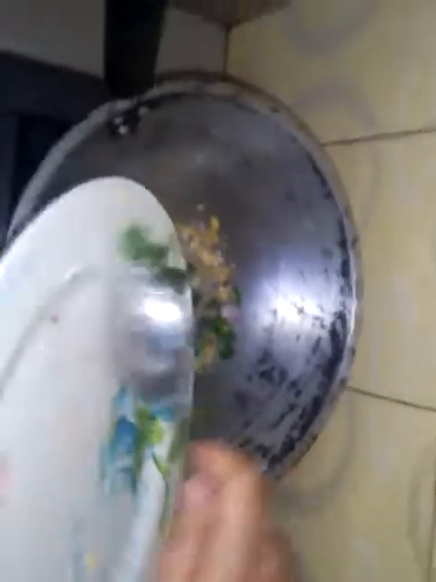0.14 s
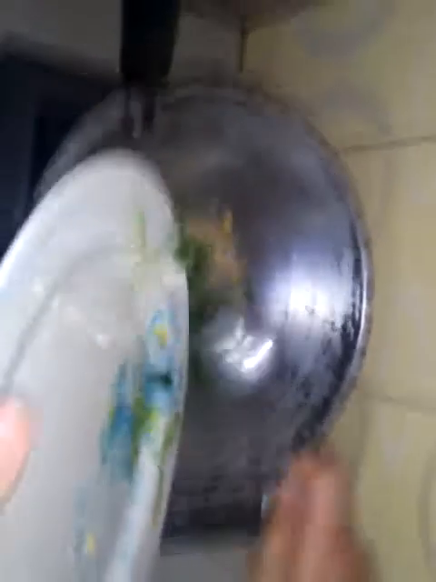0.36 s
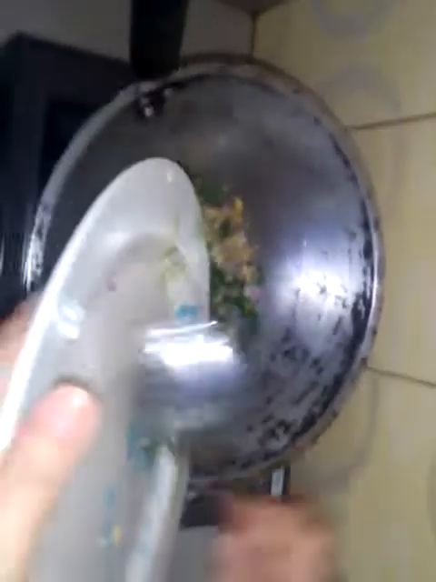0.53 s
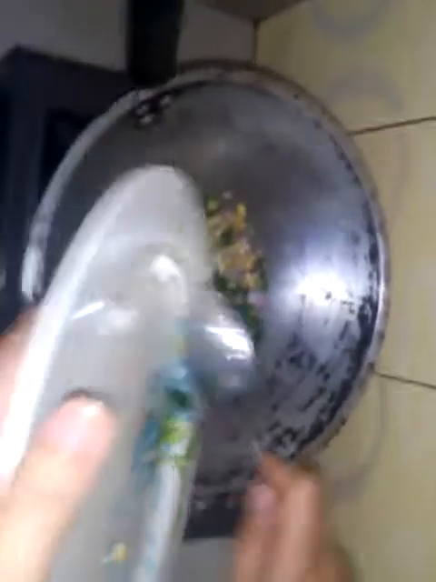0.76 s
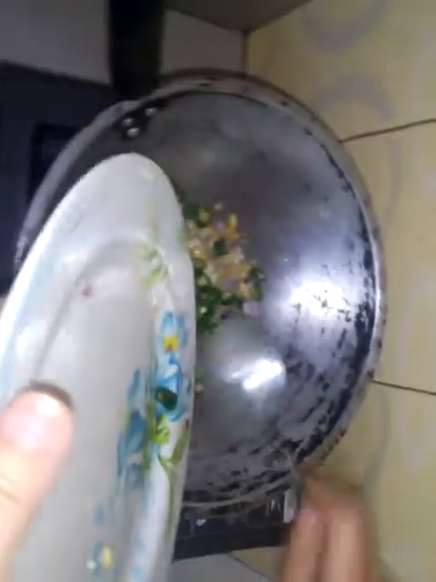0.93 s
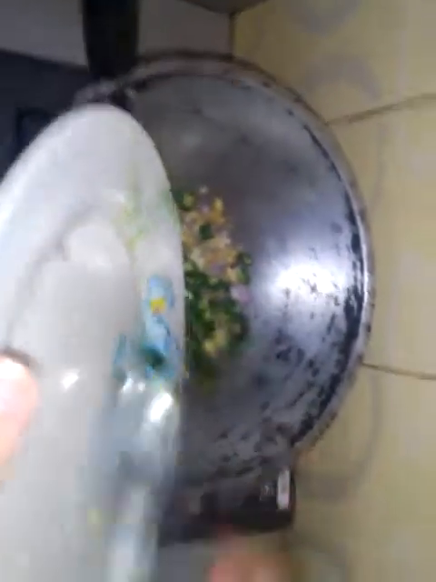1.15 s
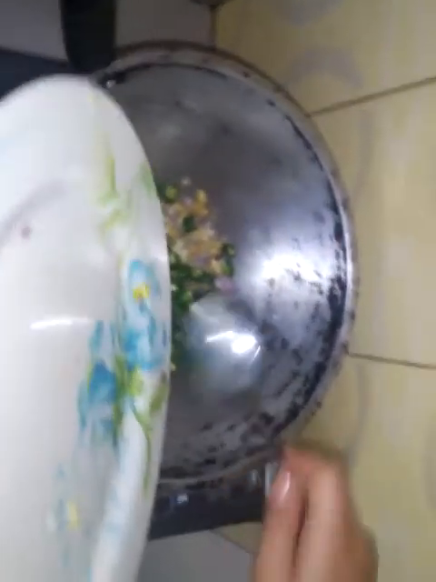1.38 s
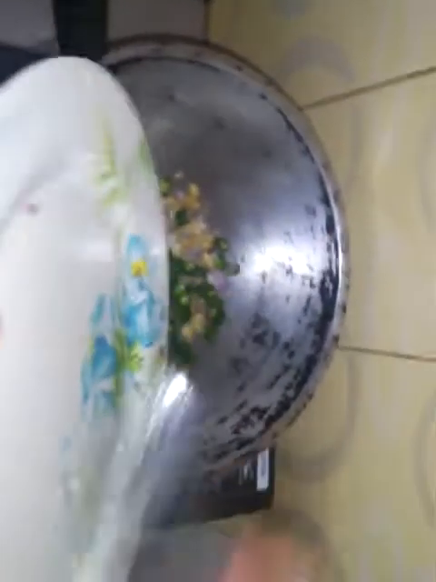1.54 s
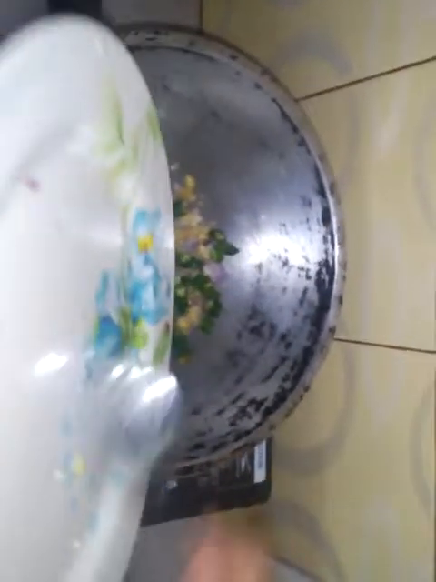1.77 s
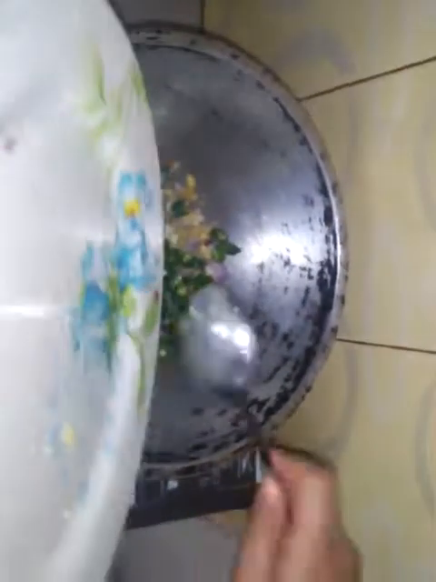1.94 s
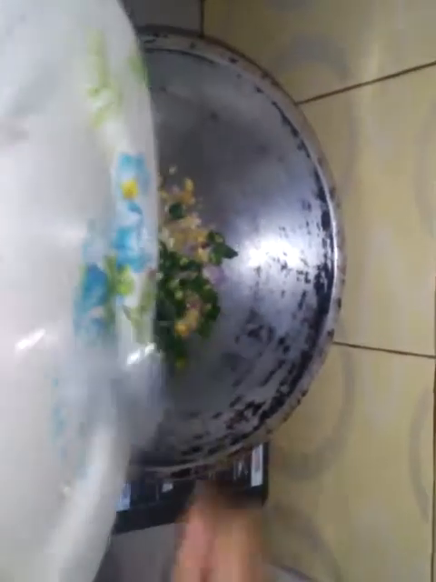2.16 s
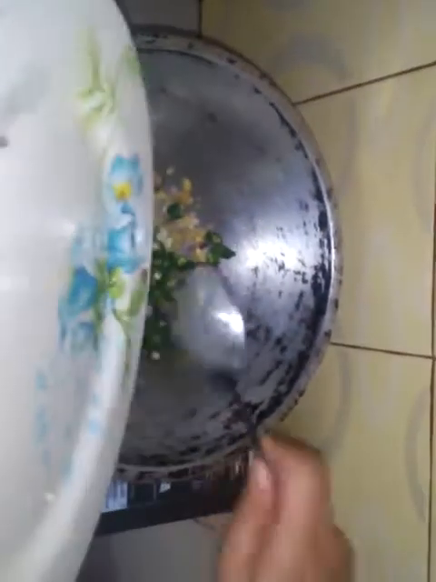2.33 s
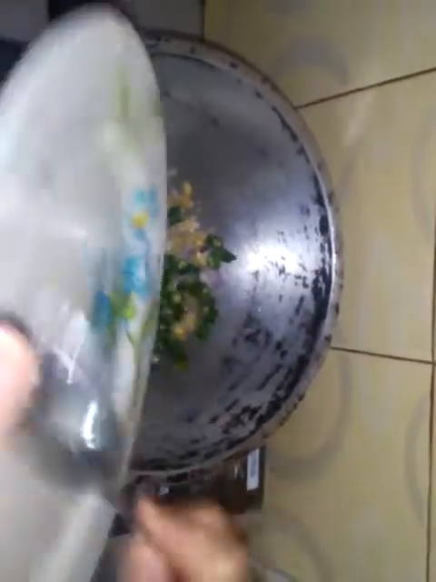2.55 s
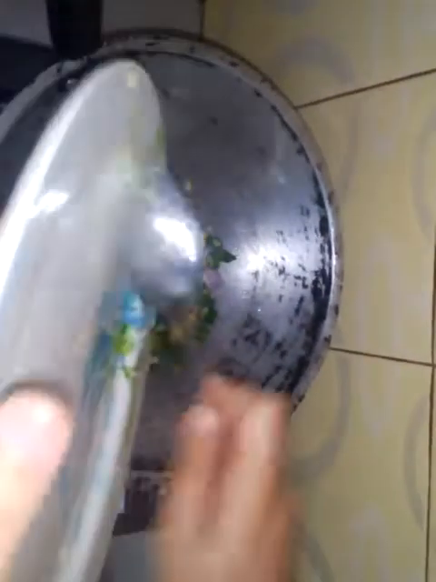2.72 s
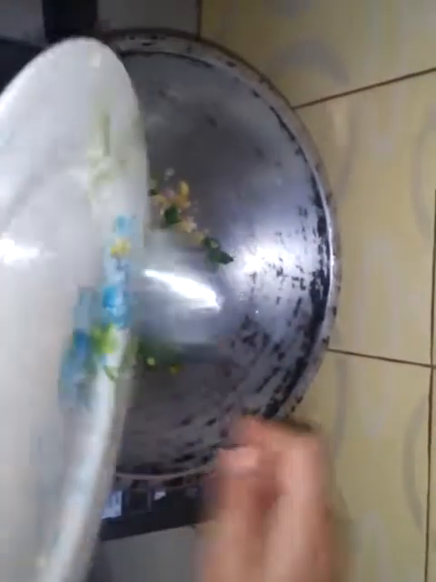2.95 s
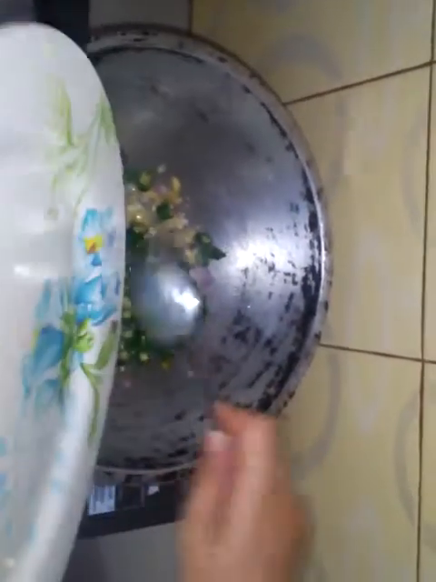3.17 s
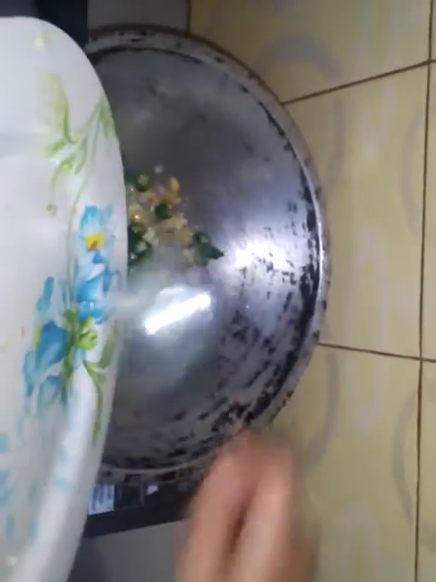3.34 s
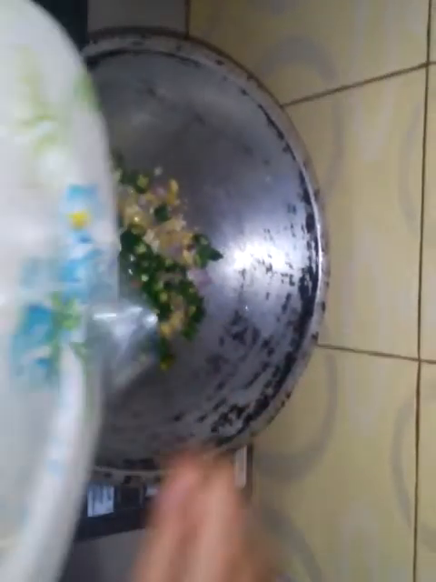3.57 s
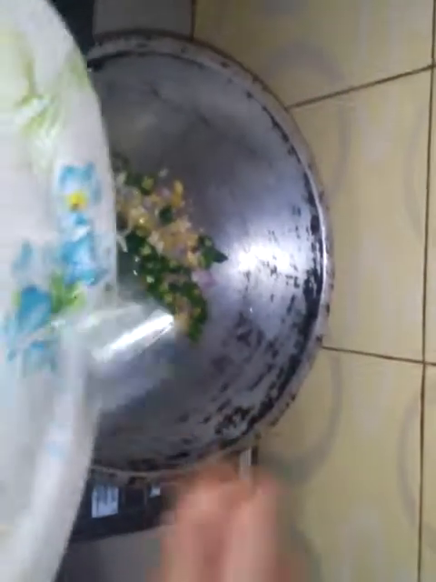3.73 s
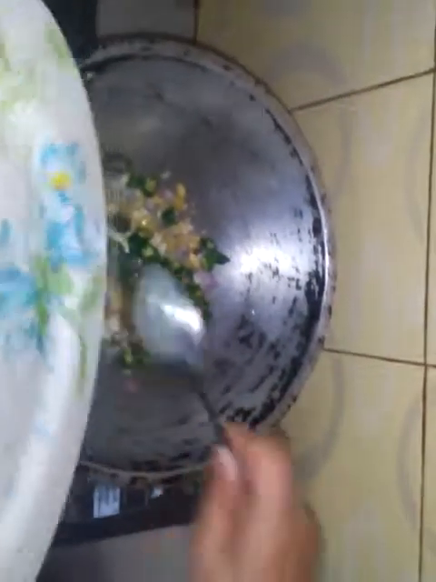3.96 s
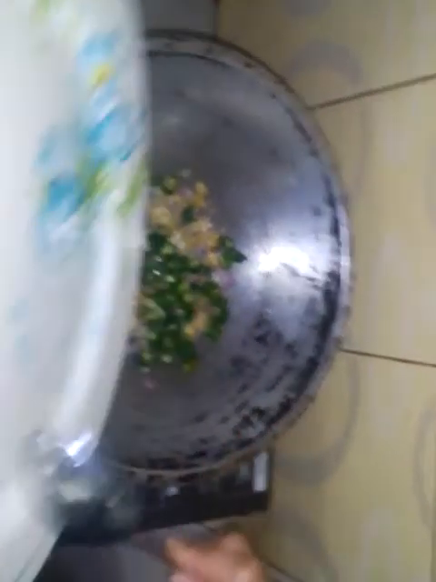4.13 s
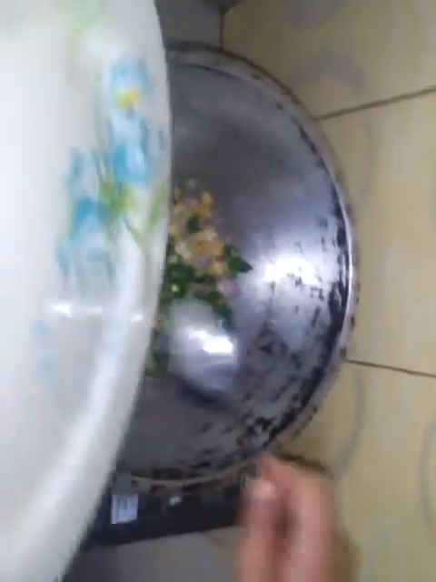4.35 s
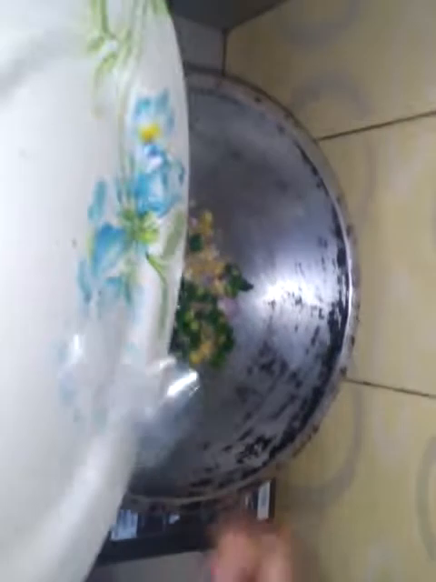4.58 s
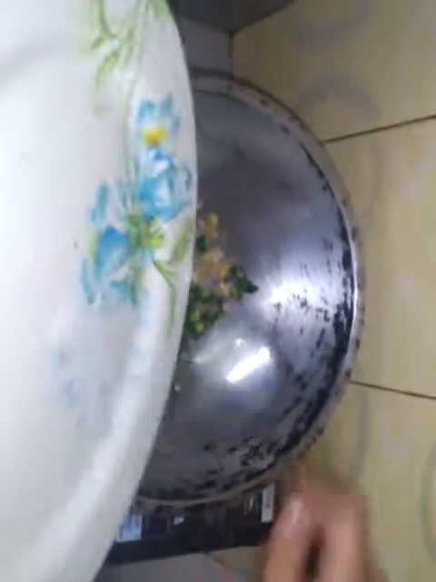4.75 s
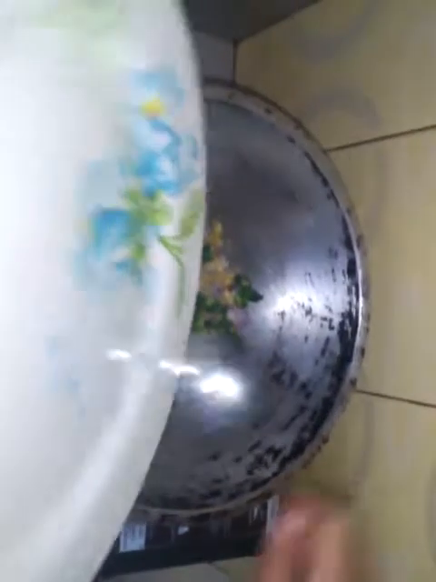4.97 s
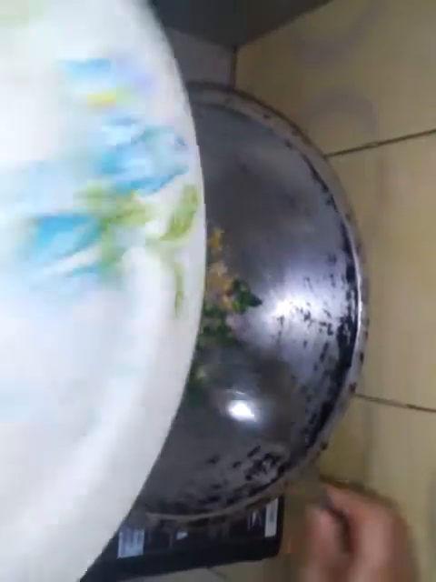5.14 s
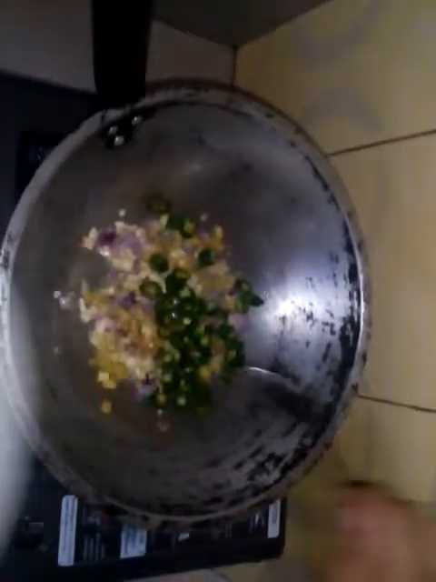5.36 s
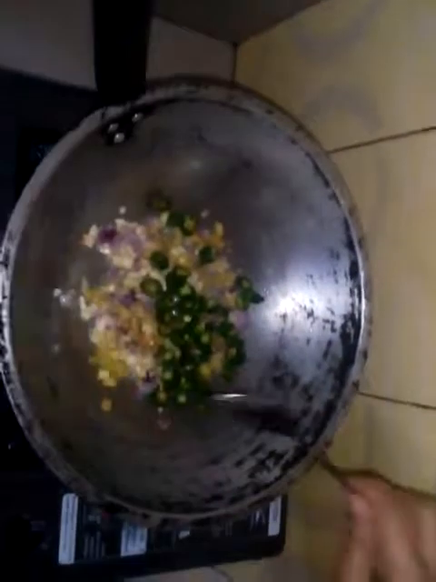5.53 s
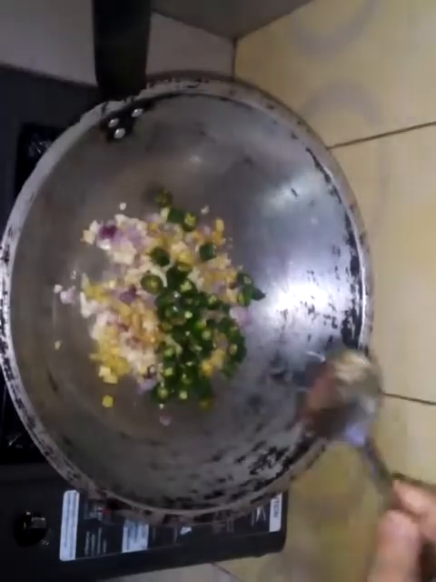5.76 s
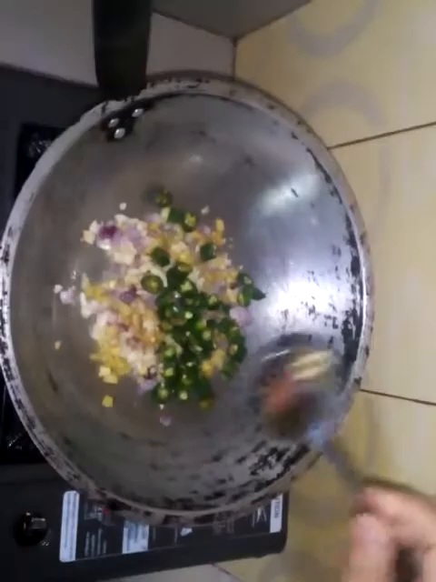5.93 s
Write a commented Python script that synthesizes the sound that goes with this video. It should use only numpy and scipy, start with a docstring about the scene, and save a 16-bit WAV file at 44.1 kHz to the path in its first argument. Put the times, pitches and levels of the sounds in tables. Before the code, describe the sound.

A phone close to a wok in a small tiled kitchen picks up a steel spoon clearing chopped vegetables off a hand-held ceramic plate. The first sharp clack comes at 0.15 s, followed by a short scrape, then a strong knock at 0.65 and a longer scrape. A quick cluster of duller taps falls around 1.15 to 1.3 s, another with a firm scrape around 1.7 to 1.85. Single hard knocks follow at 2.15, 2.55, 3.1, 3.5 and 3.85, most trailed by brief gritty rubs. The loudest clack, with a strong scrape, is at 4.25; more come at 4.55 to 5.0, then they cease. Each ring is damped and very short, with early echoes. Throughout, oil sizzles softly with small spits, over a low wavering hob drone and faint tones. A louder spit at 5.35 s and several crackles follow until 6 s, as the airy rush rises slightly.

```python
"""Sharp ceramic knocks and short scrapes: a steel spoon clears chopped vegetables off a plate held over a wok.
The phone is close. Each knock rings the modes of the hand-damped plate, with a noisy clack and early echoes;
each scrape is a run of random stick-slip taps on the glaze. Oil spits and sizzles softly as noise bursts and
bubble pops, the hob drones with a wavering hum, a rush of air and faint tones lie behind it,
and a small tiled kitchen adds a short tail to the spoon and the spits."""
import sys
import numpy as np
from scipy import signal
from scipy.fft import rfft, irfft, next_fast_len
from scipy.io import wavfile
from scipy.ndimage import uniform_filter1d

SR = 44100
rng = np.random.default_rng(int(sys.argv[2]) if len(sys.argv) > 2 else 0)


def output_pcm(signal):
    """Save a mono or channel-first signal as 16-bit PCM at the path in sys.argv[1].

    Samples are clipped to [-1, 1] before scaling.
    """
    pcm = np.clip(np.atleast_2d(signal).T, -1, 1) * 32767
    wavfile.write(sys.argv[1], SR, np.round(pcm).astype(np.int16))


N = 269010
TIME = np.arange(N) / SR


def undb(db):
    """Decibels to gain."""
    return 10 ** (np.asarray(db) / 20)


def unit(x):
    """Scale to rms 1."""
    return x / np.sqrt(np.mean(x ** 2))


def pan(db):
    """Left and right gains for a level difference, left minus right in dB."""
    return undb(np.array([[db], [-db]]) / 2)


def fade(t, t60):
    """Exponential decay that falls 60 dB in t60 seconds."""
    return np.exp(-np.log(1000) * t / t60)


def add(out, s, x):
    """Mix x into out from time s on."""
    i = max(int(s * SR), 0)
    out[:, i:i + x.shape[1]] += x[:, :N - i]


def colour(x, points):
    """Causal minimum-phase filter through (Hz, dB) points, so that attacks stay sharp."""
    n = 2 * next_fast_len(x.shape[-1] // 2 + 1024)
    hz, db = np.transpose(points)
    grid_hz = np.arange(n // 2 + 1) * SR / n
    gain_db = np.interp(np.log(grid_hz + 1), np.log(hz), db)
    # folding the cepstrum onto positive times makes the filter causal
    cepstrum = irfft(np.log(undb(gain_db)))
    cepstrum[1:n // 2] *= 2
    cepstrum[n // 2 + 1:] = 0
    return irfft(rfft(x, n) * np.exp(rfft(cepstrum)))[..., :x.shape[-1]]


def voiced(x, edges, levels_db, seconds):
    """Shape x so that its first seconds come close to the given level in each band."""
    n = int(seconds * SR)
    hz = np.arange(n + 1) * SR / (2 * n)
    for _ in range(3):  # each pass comes closer
        power = np.mean(abs(rfft(x[:, :n], 2 * n)) ** 2, axis=0) / n ** 2
        points = []
        for lo, hi, db in zip(edges, edges[1:], levels_db):
            present_db = 10 * np.log10(power[(hz >= lo) & (hz < hi)].sum())
            points.append((np.sqrt(lo * hi), db - present_db))
        x = colour(x, points)
    return x


def ports(n, likeness):
    """Noise at the left and right port of the phone, partly alike (1 is identical)."""
    mid, side = rng.standard_normal((2, n))
    c = np.clip(likeness, -1, 1)
    opposite_side = side * np.array([[1], [-1]])
    return (np.sqrt(1 + c) * mid + np.sqrt(1 - c) * opposite_side) / np.sqrt(2)


def walk(rate):
    """Smooth random wander with a spread near 1, from rate new values per second."""
    k = int(SR / rate)
    steps = np.repeat(rng.standard_normal(N // k + 1), k)
    return 1.3 * uniform_filter1d(steps, k)[:N]


def knocks(clack_db=9, tick_db=20):
    """The spoon lands on the plate; a flat blow has body, a glancing one on the rim has little."""
    # Band edges in Hz.
    knock_bands = [200, 450, 660, 1000, 1600, 2500, 4500, 7200, 15500]
    # Each row: start in seconds, level in dB, body in dB, brightness in dB, ring length factor,
    # then the three partials that lead the ring in Hz, strongest first.
    blows = [(0.1416, -26.5, -1.5, -1.5, 0.72, 1355, 1077, 5585),
             (0.3626, -43.5, -4, -3, 0.45, 1400, 1063, 3620),
             (0.6645, -23, 2.5, 1.5, 0.86, 1363, 1830, 5600), (1.1464, -25, 1.5, 1, 0.6, 1314, 2751, 5670),
             (1.217, -33.5, 16, -14.5, 0.52, 1055, 1360, 2067),
             (1.2367, -29.5, 6.5, -1, 0.55, 3671, 1057, 2025),
             (1.3061, -39, -5.5, -2.5, 0.72, 3600, 1453, 2137),
             (1.7074, -32, -1.5, 1, 0.69, 1415, 2030, 4920),
             (1.7541, -30.5, 0.5, -4.5, 0.56, 2090, 1326, 5700),
             (1.854, -30.5, 9.5, 1, 0.53, 962, 2180, 5600), (2.1478, -24.5, 9, 0, 0.58, 560, 1377, 1900),
             (2.2908, -35.5, 1.5, -5, 0.68, 1060, 1437, 2100),
             (2.566, -23.5, 5.5, -3.5, 0.73, 1387, 554, 2034),
             (3.1006, -28.5, 4, 2, 0.72, 2003, 1386, 5593), (3.1855, -24, -11, -4, 0.77, 2033, 1066, 3515),
             (3.4818, -21, 5.5, -4, 0.67, 2000, 1320, 1061), (3.8544, -25, 10, -1.5, 0.51, 1350, 551, 2006),
             (4.2324, -18.5, -9, -4.5, 0.84, 1364, 1780, 5000),
             (4.5543, -25.5, 3, 4, 0.62, 5470, 943, 1380), (4.6599, -23, -8, -1.5, 0.45, 1868, 1367, 5030),
             (4.9359, -24.5, 1, 1.5, 0.53, 2013, 924, 5540), (5.01, -26, -8.5, -6, 0.53, 3600, 2046, 5080)]
    # Each row is one band: level of an average knock in dB, share of its body, share of its brightness.
    knock_colour = [(-23.5, 0.26, 0.033), (-12, 0.88, 0), (-6, 1, 0.52), (1.5, 0.35, 0.33),
                    (1.63, 0.13, 0.33), (-1, 0, 0.49), (-0.24, 0, 1), (-8, 0.3, 0.97)]
    # Where the spoon meets the plate. Each row: time in seconds, left minus right in dB.
    spoon_pan = [(0, 2.5), (1.5, 1.7), (3.8, 3), (4.6, 1.5)]
    favour_db = 2  # the band that holds the strongest partial stands out

    out = np.zeros((2, N))
    average_db, body_share, bright_share = np.transpose(knock_colour)
    for s, db, body_db, bright_db, ring, *leading_hz in blows:
        sound = plate(max(ring, .2), tick_db, leading_hz, clack_db)
        levels_db = db + average_db + body_share * body_db + bright_share * bright_db
        levels_db[np.searchsorted(knock_bands, leading_hz[0]) - 1] += favour_db
        sound = voiced(sound, knock_bands, levels_db, 1 / 40)
        add(out, s, sound * pan(np.interp(s, *np.transpose(spoon_pan))))
    return out


def scrapes(slips_per_s=650, slip_spread_db=6, rub_db=-26, chatter_db=3.5, chatter_per_s=110,
            clack_db=11, ring=0.57, tick_db=28):
    """The spoon's edge sticks and slips on the glaze; every slip taps the plate, which the contact damps."""
    # Band edges in Hz.
    scrape_bands = [450, 1200, 3000, 7200, 15500]
    # Each row: start in seconds, end in seconds, pressure in dB, body in dB, leading partial in Hz.
    drags = [(0.19, 0.241, -7, -5, 1410), (0.283, 0.35, -2.5, -2, 524), (0.721, 0.847, 0.5, -4, 2100),
             (1.177, 1.212, -9, 12, 790), (1.758, 1.815, 9, 8.5, 2076), (1.795, 1.833, 4, 8, 754),
             (2.185, 2.247, -3, 10.5, 1002), (2.648, 2.794, -8.5, -6.5, 1410),
             (2.805, 2.877, 0.5, -20, 2030), (3.119, 3.192, -4, -1, 2002), (3.539, 3.613, -1.5, 6, 1022),
             (3.618, 3.659, 6.5, -12, 2110), (3.92, 3.995, 4, -7, 2024), (4.271, 4.337, 14, -5, 1923),
             (4.609, 4.722, 4, -5, 1326), (4.964, 5.014, 7, -2, 1400)]
    # Each row is one band: level of an average scrape in dB, share of its body,
    # growth with pressure in dB per dB.
    scrape_colour = [(-45.5, 1, 0.52), (-41, 0.25, 0.72), (-45, 0.12, 0.69), (-51.5, 0.16, 0.42)]

    out = np.zeros((2, N))
    chatter = undb(chatter_db * walk(chatter_per_s))  # the handle chatters in the fingers
    average_db, body_share, growth = np.transpose(scrape_colour)
    for start, end, pressure_db, body_db, leading_hz in drags:
        levels_db = average_db + growth * pressure_db + body_share * body_db
        n = int(max(end - start, .01) * SR)
        chance = rng.random(SR)[:n]
        size = rng.standard_normal(SR)[:n]
        grit = rng.standard_normal(SR)[:n]
        slip_sizes = undb(slip_spread_db * np.minimum(size, 1)) * np.sign(grit)
        slips = (chance < slips_per_s / SR) * slip_sizes
        rub = undb(rub_db) * grit
        force = (slips + rub) * chatter[int(start * SR):][:n] * signal.windows.tukey(n, .35)
        tap = plate(ring, tick_db, [leading_hz], clack_db)
        sound = signal.fftconvolve(tap, force[None], axes=1)
        add(out, start, voiced(sound, scrape_bands, levels_db, n / SR))
    return out


def plate(ring, tick_db, leading_hz, clack_db):
    """Answer of the plate to one tap, ring plus clack, as the two ports hear it."""
    # The left port hears the plate fuller, the right one brighter.
    # Each row: frequency in Hz, left minus right in dB.
    port_tilt = [(600, 0), (1300, 0), (2400, -2), (4400, -2.5), (8000, -3), (14000, -1.5)]

    t = np.arange(SR // 4) / SR
    sound = modes(t, ring, leading_hz) + undb(clack_db) * clack(t, ring, tick_db)
    # a plate this small radiates no bass
    bass_cut = signal.butter(4, 440, "high", fs=SR, output="sos")
    left, right = signal.sosfilt(bass_cut, sound)
    left = colour(left, [(hz, db / 2) for hz, db in port_tilt])
    right = colour(right, [(hz, -db / 2) for hz, db in port_tilt])
    return np.array([left, right])


def modes(t, ring, leading_hz, lead_db=6.5, lead_ring=1.16, scatter_db=5.0, detune=0.0041,
          phase_spread=0.86):
    """Decaying modes of plate and spoon; the grip pulls them a little, and the spot hit favours a few."""
    # Each row: frequency in Hz before the pull of the grip, level in dB before scatter and favour,
    # decay time (t60) in seconds at a ring length factor of 1.
    plate_modes = [(540, 0, 0.19), (732, 2.5, 0.11), (788.5, 2.5, 0.11), (858, 6.5, 0.05),
                   (949, -0.5, 0.11), (1059, 1.5, 0.19), (1318.4, 7, 0.087), (1414.5, -2, 0.18),
                   (1420, -41, 0.084), (1665, -2.5, 0.055), (1780, -4, 0.17), (2068, 4, 0.1),
                   (2174, -17.5, 0.3), (2337, 0.5, 0.064), (2723, -2.5, 0.13), (3456, -7, 0.16),
                   (3550, -6, 0.16), (4366, 0, 0.068), (4437, -9.5, 0.11), (5104, -3, 0.075),
                   (5400, -1.5, 0.059), (5820, -4, 0.097), (6710, -5.5, 0.077), (6750, 2.5, 0.02),
                   (7620, -11.5, 0.05), (9310, -13, 0.025), (10830, -17.5, 0.04), (11960, -14.5, 0.05),
                   (12950, -36, 0.041), (14000, -26, .035)]

    hz, db, t60 = np.array(plate_modes, float).T[:, :, None]
    count = len(plate_modes)
    size, shift, left, right = rng.standard_normal((count, 4)).T[:, :, None]
    pitch = hz * (1 + detune * shift)
    level_db = db + scatter_db * size
    for lead in leading_hz:
        nearest = np.argmin(abs(hz - lead))
        pitch[nearest] = lead
        level_db[nearest] = db[nearest] + lead_db
        t60[nearest] *= lead_ring
        # mostly direct sound, so closer in step
        right[nearest] = (left[nearest] + right[nearest]) / 2
    swing = undb(level_db) * fade(t, t60 * ring)
    # neighbouring modes start in opposite directions
    turn = 2 * np.pi * pitch * t + np.pi * np.arange(count)[:, None]
    # short waves reach the two ports more out of step
    lag = phase_spread * np.sqrt(hz / 1000)
    return np.array([(swing * np.sin(turn + lag * port)).sum(axis=0) for port in (left, right)])


def clack(t, ring, tick_db, hold_s=0.0072, rattle_t60=0.22, linger_db=-12, linger_t60=0.69, top_db=4.0):
    """A contact tick and its dense rattle in the metal, thrown back by the wok and the tiles."""
    # Early echoes from the wok wall and the tiles.
    # Each row: delay in seconds before its random shift, level in dB against the tick.
    early_echoes = [(.0013, -2.5), (.0034, -5.5), (.0053, 0), (.0088, -16.5), (0.0134, -4.5)]
    # Colour of the contact. Each row: frequency in Hz, filter gain in dB.
    clack_colour = [(100, -60), (250, 7.5), (410, -12), (530, -5), (1300, -1.5), (2200, -3), (3200, -7),
                    (6500, -12.5), (8000, -24), (11000, -27.5), (15500, -36)]

    # the sound bounces between plate and wok for a moment, then escapes and leaves a weak ring
    bouncing = fade(np.maximum(t - hold_s, 0), rattle_t60 * ring)
    bouncing = bouncing + undb(linger_db) * fade(t, linger_t60 * ring)
    body = colour(ports(len(t), .3) * bouncing, [(2000, 0), (5000, -20)])
    top = colour(ports(len(t), 0) * bouncing * fade(t, .25), [(1500, -20), (3500, 0)])
    sound = body + undb(top_db) * top
    sound[:, 6] += undb(tick_db)  # the tick itself, six samples in
    for delay, db in early_echoes:
        # the plate moves, so each echo comes a little earlier or later at each port
        arrival = (delay * SR * rng.uniform(.85, 1.15, 2)).astype(int)
        sound[[0, 1], arrival] += undb(tick_db + db)
    return colour(sound, clack_colour)


def spits(t60=0.046, snap_t60=0.0034, snap_db=9):
    """Single drops of water burst in the oil: a noise snap, then a patter back off the wok."""
    # Each row: start in seconds, rms level of the first 2 ms in dB, centre of the noise colour in Hz.
    oil_spits = [(0.4676, -40, 6100), (0.568, -34, 2960), (1.3975, -34, 3430), (1.5432, -35, 3350),
                 (2.0546, -38.5, 5390), (2.434, -38.5, 6500), (2.931, -30.5, 2960), (3.3444, -37, 12600),
                 (4.5198, -38, 5270), (5.334, -27, 5100), (5.4105, -36, 12900), (5.546, -36.5, 5720),
                 (5.7175, -31.5, 5660), (5.903, -36, 12500), (6.0118, -37, 4770)]

    out = np.zeros((2, N))
    t = np.arange(SR // 20) / SR
    for s, db, hz in oil_spits:
        decay = fade(t, t60) + undb(snap_db) * fade(t, snap_t60)
        burst = ports(len(t), 0.07) * decay
        burst = colour(burst, [(hz / 10, -25), (hz / 3, -7), (hz, 0), (hz * 3, -6)])
        onset_rms = np.sqrt(np.mean(burst[:, :SR // 500] ** 2))
        add(out, s, burst / onset_rms * undb(db))
    return out


def sizzle(pops_per_s=700, pop_spread_db=2.0, hiss_db=1, flutter_db=0.7, smear_t60=0.09):
    """Countless tiny steam bubbles pop over a fine hiss; the bowl smears each pop."""
    # Colour of the frying. Each row: frequency in Hz, filter gain in dB.
    sizzle_colour = [(530, -33), (900, -9), (1210, -5), (1480, 1), (1650, -10), (2200, 0.5), (2540, -5.5),
                     (3220, -2.5), (3850, -3.5), (6270, -0.5), (8250, -13.5), (12700, -7.5), (15500, -9.5)]
    sizzle_db = -48  # the oil fries steadily around this level

    sizes = undb(pop_spread_db * np.minimum(rng.exponential(size=N), 4.5))
    pops = (rng.random(N) < pops_per_s / SR) * sizes * rng.standard_normal((2, N))
    t = np.arange(SR // 50) / SR
    bowl = 0.077 * ports(len(t), 0) * fade(t, smear_t60)
    bowl[:, 0] = 1  # direct sound
    pops = signal.fftconvolve(pops, bowl, axes=1)[:, :N]
    hiss = undb(hiss_db) * ports(N, 0.017)
    sound = colour(unit(pops) + hiss, sizzle_colour)
    return unit(sound) * undb(sizzle_db + flutter_db * walk(6.7)) * pan(-2.0)


def hob(hum_hz=114, hum_db=-49, hum_wander_hz=5, throb_db=3):
    """A low drone of hob and fan as filtered noise, a wavering sine hum, and a soft rush of air."""
    # Colour of the drone. Each row: frequency in Hz, filter gain in dB.
    drone_colour = [(20, -19.5), (42, -22), (60, -13), (88, -2), (125, -5.5), (150, -9.5), (190, -19),
                    (240, -13), (300, -20.5), (420, -18.5), (700, -26.5), (1100, -28.5), (2000, -56.5)]
    # the drone swells slowly: mean level, depth, length of one swell, time of a crest
    drone_db, swell_db, swell_s, crest_s = -44.5, 1.64, 5.7, 4.87
    # the rush grows as the plate is lifted off the wok: level while covered, rise, start of the lift
    rush_db, rush_db_per_s, lift_s = -54.5, 3.5, 4.64

    swell = swell_db * np.cos(2 * np.pi * (TIME - crest_s) / swell_s)
    drone = unit(colour(ports(N, 0.98), drone_colour)) * undb(drone_db + swell)
    phase = 2 * np.pi * np.cumsum(hum_hz + hum_wander_hz * walk(14)) / SR
    hum = unit(np.sin(phase) * undb(throb_db * walk(19))) * undb(hum_db)
    air_points = [(150, -22), (400, -4), (800, -8.0), (1300, -10.5), (3000, -17.0), (8000, -50)]
    air = unit(colour(ports(N, 0.12), air_points))
    rush = air * undb(rush_db + rush_db_per_s * np.maximum(TIME - lift_s, 0))
    return (drone + hum + rush) * pan(3.5)


def tones(flutter_db=1.9, fade_s=0.047):
    """Faint wavering sine tones come and go in the background, towards the left."""
    # Each row: start in seconds, end in seconds, frequency in Hz, mean level in dB before panning,
    # wander in Hz.
    faint_tones = [(0, 1.35, 188, -58, .5), (2.68, 3.14, 420, -57.5, 6)]

    out = np.zeros(N)
    for start, end, hz, db, wander_hz in faint_tones:
        gate = np.clip(np.minimum(TIME - start, end - TIME) / fade_s, 0, 1)
        phase = 2 * np.pi * np.cumsum(hz + wander_hz * walk(27.0)) / SR
        out += np.sqrt(2) * np.sin(phase) * gate * undb(db + flutter_db * walk(16))
    return out * pan(9.8)


def kitchen(x, wet_db=-16, t60=0.29, onset_s=0.019):
    """Diffuse tail from the tiled walls: decaying noise with a soft onset, convolved with the sound."""
    t = np.arange(SR // 2) / SR
    build_up = 1 - np.exp(-(t / onset_s) ** 2)
    tail = ports(len(t), 0.15) * fade(t, t60) * build_up
    tail = colour(tail, [(500, -11.5), (2000, -3.5), (6000, -4), (14000, -10)])
    tail /= np.sqrt(np.sum(tail ** 2) / 2)
    return x + undb(wet_db) * signal.fftconvolve(x, tail, axes=1)[:, :N]


def scene():
    """Spoon, plate and spits in the kitchen, over the sizzle, the hob and faint tones."""
    return kitchen(knocks() + scrapes() + spits()) + sizzle() + hob() + tones()


def record(dry, top_hz=15900):
    """The phone clips the highest peaks and cuts the top."""
    top_cut = signal.ellip(8, .2, 70, top_hz, fs=SR, output="sos")
    return signal.sosfilt(top_cut, np.clip(dry, -1, 1))


dry = scene()
out = record(dry)
output_pcm(out)
```